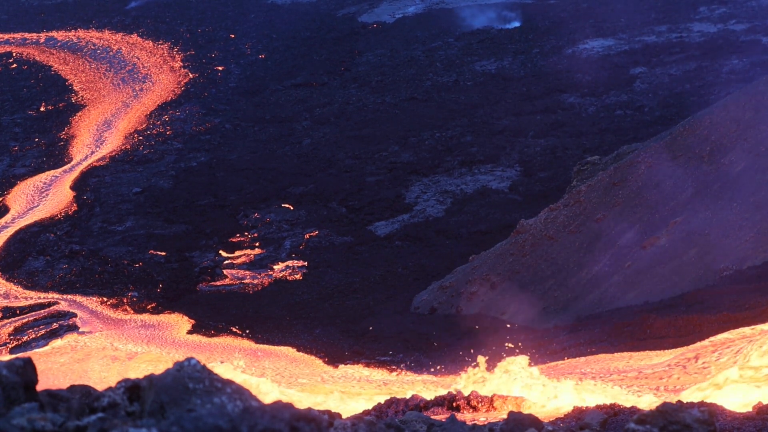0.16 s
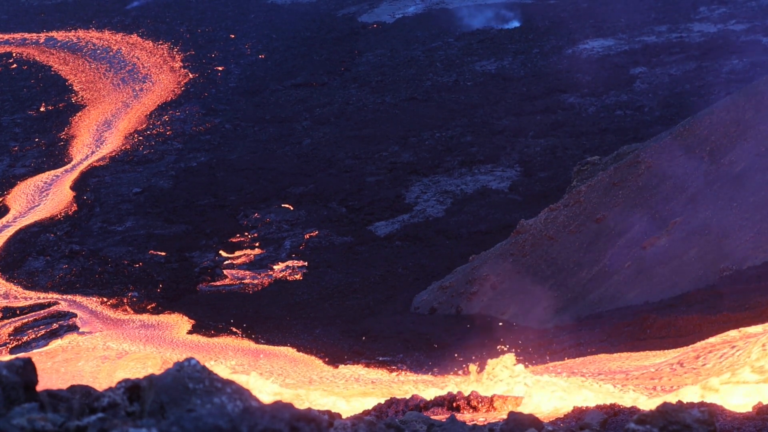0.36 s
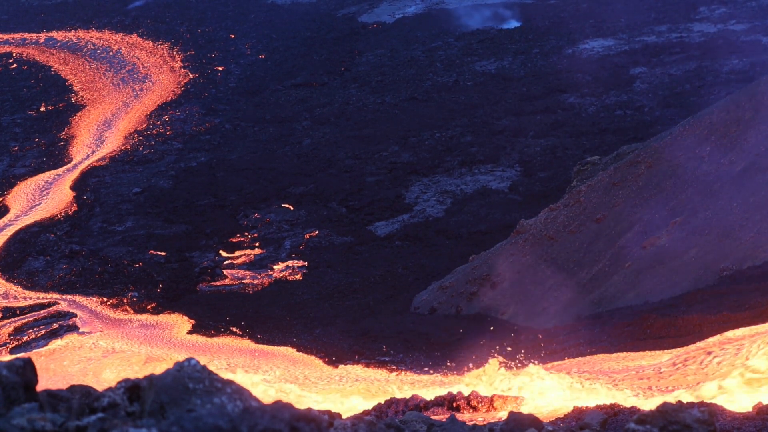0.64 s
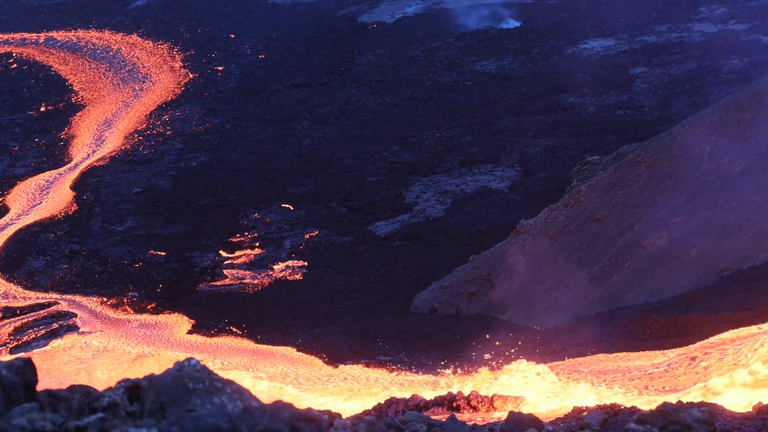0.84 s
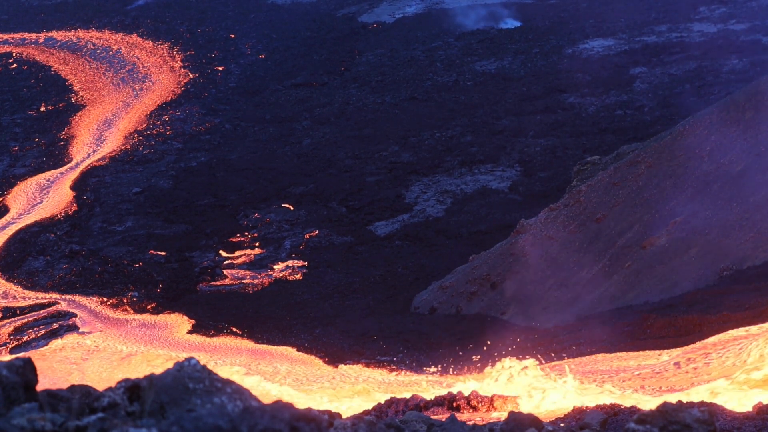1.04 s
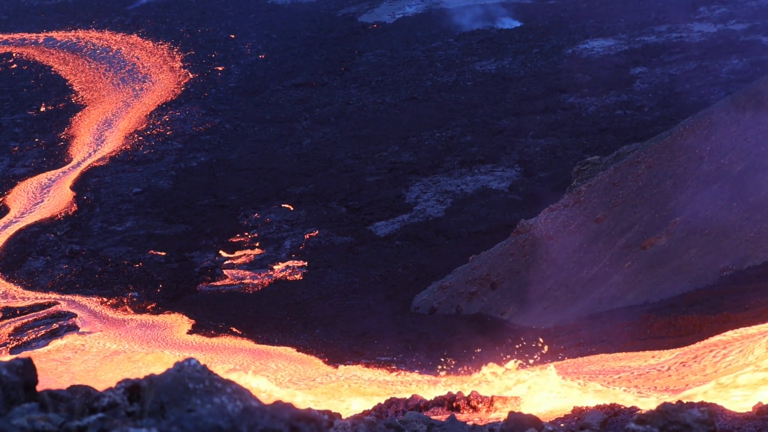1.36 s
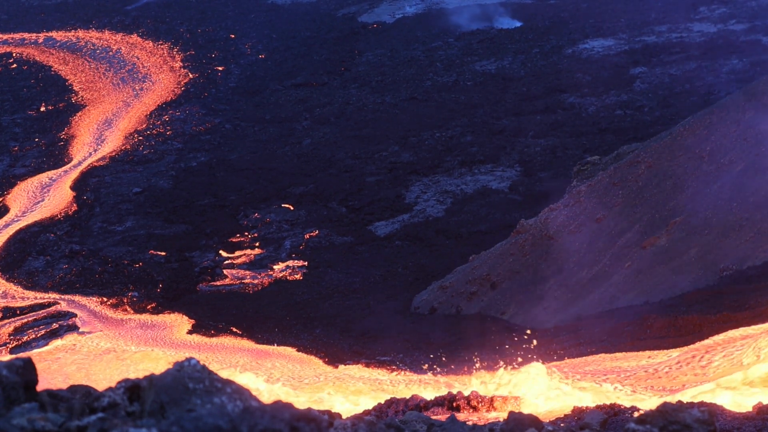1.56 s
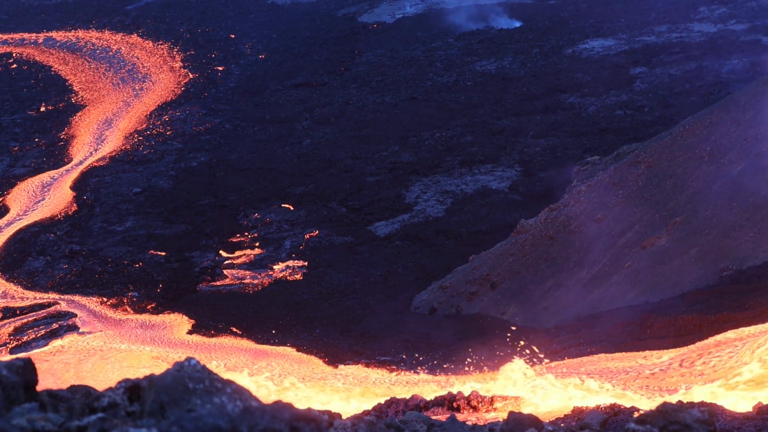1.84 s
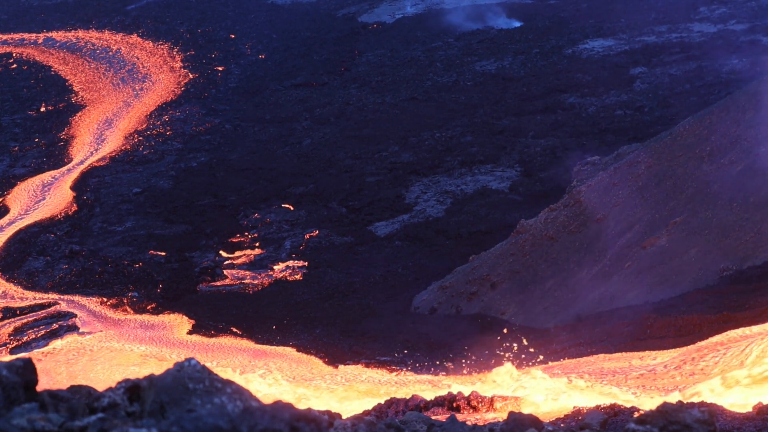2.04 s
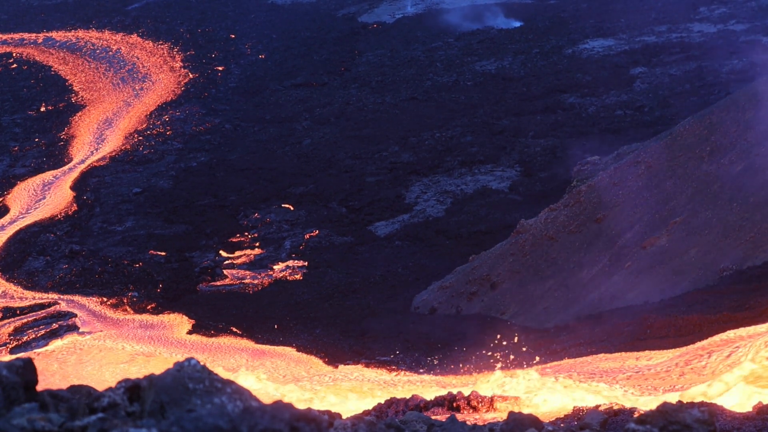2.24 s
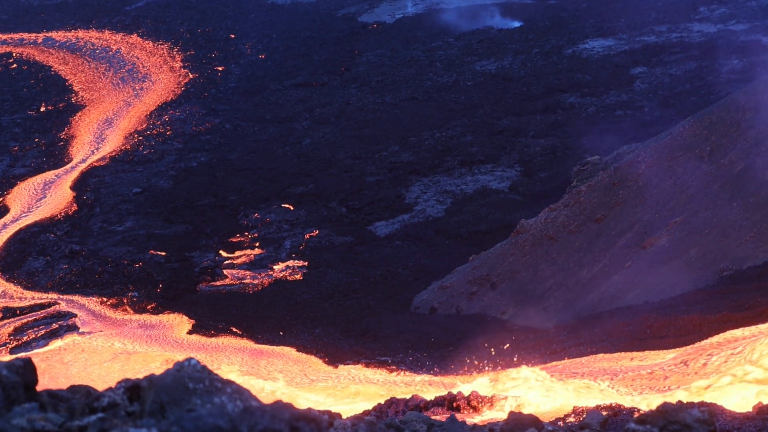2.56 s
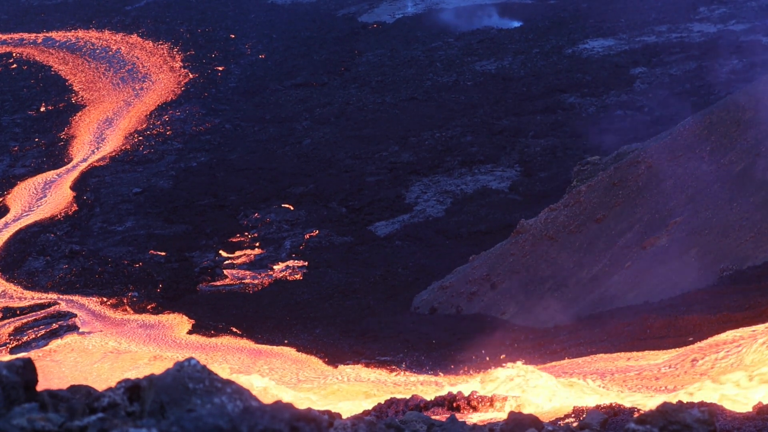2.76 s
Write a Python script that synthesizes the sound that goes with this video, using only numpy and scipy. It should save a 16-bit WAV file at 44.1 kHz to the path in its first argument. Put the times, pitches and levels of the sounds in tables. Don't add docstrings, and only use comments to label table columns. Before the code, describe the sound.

A lava river gives a steady dense rush with small plops and sharp ticks, outdoors at some distance. Gusty wind rumbles and thumps an unshielded stereo camera microphone; loose cinders crunch close on the right near the end.

```python
import sys
import numpy as np
from scipy import signal
from scipy.io import wavfile
from scipy.ndimage import uniform_filter1d

SR = 44100
rng = np.random.default_rng(int(sys.argv[2]) if len(sys.argv) > 2 else 0)


def undo_db(level):
    steps = np.asarray(level, float) / 20
    return 10 ** steps


def wrap_up_sound(samples):
    columns = np.atleast_2d(samples).T
    tamed = np.clip(columns, -1, 1)
    steps = np.round(tamed * 32767).astype(np.int16)
    wavfile.write(sys.argv[1], SR, steps)


N = 128331

# t/s, level/dB
LAVA_SURGE = [(0.0, -43), (1.08, -44), (1.33, -41), (1.56, -42), (1.81, -41), (1.81, -38), (1.84, -44.5),
              (1.97, -40), (2.11, -43), (2.16, -40), (2.42, -43.5), (2.5, -40), (2.5, -36.5), (2.54, -42),
              (2.63, -37), (2.64, -34.5), (2.67, -40), (2.91, -40)]
# f/Hz, density/dB per Hz
LAVA_ROAR = [(400, -10.5), (890, -14), (1300, -13.5), (2600, -18.5), (4060, -23.5), (5500, -20.5),
             (7800, -28.5), (12500, -43)]
# f/Hz, share/1
SURGE_SHARE = [(300, 0.84), (2000, 1), (5000, 0.28), (12000, 0.47)]
# centre t/s, right peak level/dB,
# f/Hz
CLOTS = [(0.085, -31, 822), (0.138, -31, 537), (0.149, -36, 2380), (0.186, -34, 1300), (0.188, -32, 2660),
         (0.286, -28.5, 689), (0.328, -35.0, 1300), (0.337, -35, 830), (0.587, -31, 990),
         (0.665, -20.5, 380), (0.725, -38, 800), (0.737, -45, 540), (0.867, -36, 460), (0.921, -36.0, 1450),
         (1.072, -32.0, 783), (1.184, -31, 1503), (1.241, -40, 1930), (1.243, -30, 830),
         (1.284, -33.0, 1290), (1.304, -34.0, 1230), (1.32, -28, 1200), (1.334, -31, 1080),
         (1.43, -31.5, 1158), (1.464, -32, 1360), (1.585, -33.0, 820), (1.651, -30, 1300),
         (1.708, -31, 845), (1.721, -29, 1002), (1.811, -39, 1800), (1.811, -35.0, 2670),
         (1.843, -25.0, 370), (1.93, -33, 1158), (1.942, -30, 824), (1.952, -30, 1190), (1.985, -33, 783),
         (1.988, -38.0, 2360), (1.994, -32, 1020), (2.082, -40, 1691), (2.188, -38.0, 2470),
         (2.227, -32, 1720), (2.508, -40, 2200), (2.508, -31, 1409), (2.576, -30.0, 1180),
         (2.588, -32.0, 1100), (2.621, -19.0, 550), (2.626, -34, 2740), (2.635, -23, 626),
         (2.645, -18, 1033), (2.667, -23, 653), (2.692, -23, 740), (2.748, -30, 820), (2.817, -26.0, 600),
         (2.86, -24, 1163), (2.886, -24, 820), (2.886, -28.5, 1430), (2.909, -27, 751)]
# t/s, peak level/dB, f/Hz, left minus right/dB
TICKS = [(.081, -28.5, 600, -20), (0.171, -29, 5030, -5), (.189, -35, 1500, -15), (0.283, -24, 1100, -12),
         (.725, -19, 465, -10), (.914, -28.5, 900, -16), (.99, -37, 4000, -18), (1.079, -27, 600, -12),
         (1.494, -29, 1100, 18), (1.712, -32, 2800, -10), (1.809, -23.5, 1840, -14), (1.979, -32, 1170, -3),
         (2.504, -23, 2010, -12)]
# start t/s, length/s, level/dB, pitch scale/1
CRUNCHES = [
    (.645, 0.037, -33.5, 0.54),
    (1.839, .03, -52, 1.04),
    (2.565, 0.014, -36, 2.1),
    (2.607, 0.051, -26.5, 1.06),
    (2.686, 0.051, -37, 1.17),
    (2.792, 0.018, -32, 1.03),
    (2.86, 0.0073, -34, 1.57),
    (2.876, 0.0091, -30.5, 0.71),
]
# f/Hz, width/Hz, level/dB
CINDER_MODES = [(290, 390, -7), (469, 107, 3), (649, 103, -2), (973, 400, -2.5), (1500, 260, -16),
                (2630, 1800, -22), (5560, 3800, -12)]
# f/Hz, left minus right/dB
PORT_PAN = [(60, -10), (130, -8), (290, -4.5), (640, -11.5), (1410, -8.0), (3100, -7), (6820, -1.5),
            (15000, 2)]
# f/Hz, correlation/1
PORT_SAME = [(300, .3), (700, .58), (1500, .66), (2800, .68), (5000, .8), (8000, .55), (10000, .4),
             (12500, .05)]
# f/Hz, left lead/rad
PORT_TURN = [(340, -.8), (690, 0.0), (1980, .4), (3190, .25), (4570, 1.0), (6500, .6), (8350, .5),
             (10500, 0.0)]
# centre t/s, peak level/dB, f/Hz, left minus right/dB
EDDIES = [(0.146, -24, 53.7, -13), (0.157, -40, 111, 0), (0.195, -31.5, 178, 11), (0.475, -20, 33.2, -2.5),
          (0.661, -24, 54, -3), (0.684, -21, 88.4, -5), (0.733, -29, 169, 0.0), (0.739, -23, 66, -5),
          (0.873, -27.5, 96, 8), (0.874, -24.5, 49.7, 3), (0.928, -26, 81, -7), (0.955, -23.5, 32, -10),
          (1.035, -20, 80, -4.0), (1.033, -26, 132, -8), (1.108, -21.5, 78, -6.5), (1.173, -23, 36.7, -3),
          (1.238, -24.5, 40.7, -0.0), (1.384, -34, 66, 3.0), (1.386, -31, 132, 6), (1.397, -21.5, 95, 0),
          (1.427, -29, 37.4, -16), (1.503, -22.5, 99, -10.0), (1.583, -24.5, 31.7, 4),
          (1.611, -23, 57.3, 1), (1.69, -19, 66.4, -2), (1.721, -25, 119, 0), (1.772, -23.5, 49, -13),
          (1.772, -29, 94, -3), (1.791, -33, 136, -5.0), (1.801, -29, 177.6, 0), (1.836, -31, 207, 0),
          (1.846, -14.5, 56.7, 1.5), (1.901, -27, 138, 3.0), (1.91, -30, 200, -2), (1.934, -32, 107, 17),
          (1.992, -28, 59, -5.0), (1.991, -31, 145, -5), (2.031, -24, 32.7, 9), (2.084, -25.6, 111, -5.5),
          (2.125, -24.5, 32.7, -7), (2.161, -23, 122, -8), (2.189, -25, 68.6, -7), (2.506, -36, 133, 4),
          (2.548, -25.5, 140, -6), (2.549, -22.4, 84.5, -3), (2.635, -33.5, 258, -15), (2.685, -29, 57, -8),
          (2.76, -22, 75, 3)]
# t/s, gust level/dB, sharpness/dB
GUSTS = [(0.0, -22, -22.5), (0.14, -19.5, -15), (0.29, -27.5, -3.5), (0.49, -21.5, -21), (0.53, -25, -10.5),
         (0.7, -20, -21), (0.76, -29, 3), (1.18, -20, -8.5), (1.34, -27, -5.5), (1.39, -22, -12.5),
         (2.14, -22, -9.5), (2.24, -25.5, -7.5), (2.59, -22, -11.5), (2.64, -26, 4), (2.68, -20.5, -12),
         (2.72, -28, 12), (2.75, -22.5, -14), (2.91, -24.5, -17)]
# f/Hz, density/dB per Hz
BUFFET = [(8.8, -37), (15, -5), (38, 2), (75, -2), (109, -2.5), (221, -13), (409, -15.5), (900, -13),
          (1170, -65), (1980, -120)]
# f/Hz, correlation/1
BUFFET_SAME = [(30, 1), (80, 0.84), (160, 0.055), (300, -0.23), (600, 0.72)]


def evened(x):
    return x / np.sqrt(np.mean(x ** 2) + 1e-20)


def read(points, hz):
    f, value = np.transpose(points)
    return np.interp(np.log(hz + 1), np.log(f + 1), value)


def add(mix, start_s, sound):
    part = mix[..., round(start_s * SR):][..., :sound.shape[-1]]
    part += sound[..., :part.shape[-1]]


def panned(left_minus_right_db):
    return left_minus_right_db * np.array([[.5], [-.5]])


def highpass(hz, corner_hz, order):
    return 1 / (1 + (corner_hz / (hz[:, None] + 1)) ** order)


def ring(x, hz, width_hz):
    r = np.exp(-np.pi * width_hz / SR)
    pole = [1, -r * np.exp(2j * np.pi * hz / SR)]
    return 2 * signal.lfilter([(1 - r) ** 2], np.convolve(pole, pole), x).real


def blobs(shape, bins, frames):
    field = uniform_filter1d(rng.standard_normal(shape), bins, 0)
    return evened(uniform_filter1d(field, frames, 1))


def spectra(x, size):
    return signal.stft(x, SR, nperseg=size, noverlap=size * 3 // 4)


def sound_of(z, size):
    return signal.istft(z, SR, nperseg=size, noverlap=size * 3 // 4)[1][..., :N]


def pair(a, b, same):
    same = np.clip(same, -1, 1)[:, None]
    return np.array([same * a + np.sqrt(1 - same ** 2) * b, a])


def spatter():
    rate_per_s, spread_db, decay_samples = 700, 0.5, 9.3
    landed = rng.random((2, N)) < rate_per_s / SR
    strength = undo_db(spread_db * np.minimum(rng.exponential(1, (2, N)), 5))
    click = rng.standard_normal(200) * np.exp(-np.arange(200) / decay_samples)
    drops = landed * strength * rng.choice([-1., 1.], (2, N))
    return evened(signal.oaconvolve(drops, click[None])[:, :N])


def lava():
    level_db, spatter_db, patch_db, flicker_db = -39.5, -21, 0.5, 0.82
    fizz_hz, fizz_db = 10800, 1.5
    clicks = undo_db(spatter_db) * spatter()
    hz, t, z = spectra(rng.standard_normal((2, N)) + clicks, size=512)
    shape = z[0].shape
    surge = np.interp(t, *np.transpose(LAVA_SURGE))
    field = read(LAVA_ROAR, hz)[:, None] + read(SURGE_SHARE, hz)[:, None] * (surge - surge.mean())
    field = field + patch_db * blobs(shape, bins=8, frames=25)
    field = field + flicker_db * blobs(shape, bins=60, frames=8)
    field = field + fizz_db * blobs(shape, bins=25, frames=14) * highpass(hz, fizz_hz, 8)
    return undo_db(level_db) * evened(sound_of(z * undo_db(field) * highpass(hz, 224.0, 4), size=512))


def puff(hz, length_s, sag):
    u = np.arange(0, length_s, 1 / SR) / length_s
    phase = rng.random() + 0.16 * rng.standard_normal((2, 1))
    turns = np.cumsum(hz * (1 + sag * (.5 - u))) / SR + phase
    return np.sin(np.pi * u ** 0.95) ** 2 * np.sin(2 * np.pi * turns)


def clots():
    length_s, level_db, sag, left_db = 0.00894, 0.5, 0.19, -15
    mix = np.zeros((2, N))
    for centre_s, peak_db, hz in CLOTS:
        gain = undo_db(peak_db + level_db + left_db * np.array([[1], [0]]))
        add(mix, centre_s - length_s / 2, puff(hz, length_s, sag) * gain)
    return mix


def tick(peak_db, hz, pan_db):
    t60_s, spread, level_db, attack_s = 0.042, 0.48, -8.5, 0.00093
    t = np.arange(0, .05, 1 / SR)
    spit = rng.standard_normal(len(t)) * np.minimum(t / attack_s, 1) * undo_db(-60 * t / t60_s)
    x = ring(spit, hz * 0.92, hz * 2 * spread)
    return x / abs(x).max() * undo_db(peak_db + level_db + panned(pan_db))


def ticks():
    mix = np.zeros((2, N))
    for start_s, *row in TICKS:
        add(mix, start_s, tick(*row))
    return mix


def crunch(length_s, level_db, scale):
    slips_per_s, rise_s, tail_s = 260, .014, 0.017
    t = np.arange(0, length_s + .1, 1 / SR)
    wander = evened(uniform_filter1d(rng.standard_normal(9000), size=150))
    turns = np.cumsum(slips_per_s * (1 + .7 * wander)) / SR
    slips = np.diff(np.floor(turns), prepend=0) + 0.017 * rng.standard_normal(9000)
    x = np.zeros(9000)
    for k, (hz, width_hz, db) in enumerate(CINDER_MODES):
        x += (-1) ** k * undo_db(db) * evened(ring(slips, hz * scale, width_hz * scale))
    shape = np.minimum(t / rise_s, 1) * np.exp(-np.maximum(t - length_s, 0) / tail_s)
    return undo_db(level_db) * evened(x)[1000:1000 + len(t)] * shape


def crunches():
    mix = np.zeros((2, N))
    for start_s, *row in CRUNCHES:
        add(mix, start_s, np.array([crunch(*row), crunch(*row)]))
    return mix


def ports(direct, scattered):
    hz, t, (za, zb) = spectra(np.array([direct, scattered]), size=512)
    z = pair(za, zb, read(PORT_SAME, hz))
    half = undo_db(read(PORT_PAN, hz) / 2)
    z = z * np.array([half * np.exp(1j * read(PORT_TURN, hz)), 1 / half])[..., None]
    return sound_of(z, size=512)


def eddies():
    level_db, sag = 2.5, 0.1
    mix = np.zeros((2, N))
    for centre_s, peak_db, hz, pan_db in EDDIES:
        length_s = 0.0527 * (75 / hz) ** 0.355
        gain = undo_db(peak_db + level_db + panned(pan_db))
        add(mix, max(centre_s - length_s / 2, 0), puff(hz, length_s, sag) * gain)
    return mix


def wind():
    reach_from_hz, reach, lump_db, pan_db = 118, 0.38, 1, -3
    hz, t, (a, b) = spectra(rng.standard_normal((2, N)), size=2048)
    s, gust_db, sharp_db = np.transpose(GUSTS)
    sharpness = np.interp(t, s, sharp_db - sharp_db.mean())
    field = read(BUFFET, hz)[:, None] + reach * highpass(hz, reach_from_hz, 4) * sharpness
    z = pair(a, b, read(BUFFET_SAME, hz)) * undo_db(field)
    z = z / (1 + (hz[:, None] / 368.0) ** 4) * highpass(hz, 16.4, 4)
    z = z * undo_db(lump_db * np.array([blobs(a.shape, bins=6, frames=4) for _ in "lr"]))
    level = np.interp(np.arange(N) / SR, s, gust_db)
    return evened(sound_of(z, size=2048)) * undo_db(level + panned(pan_db))


def hiss():
    corner_hz, level_db, same = 11800, -60, -0.14
    hz, t, (a, b) = spectra(rng.standard_normal((2, N)), size=512)
    z = pair(a, b, same + 0 * hz) * highpass(hz, corner_hz, 6)
    return undo_db(level_db) * evened(sound_of(z, size=512))


def scene():
    crunch_db, crunch_pan_db, wind_db = -4, -3.5, -2.5
    cinders = ports(*crunches()) * undo_db(crunch_db + panned(crunch_pan_db))
    clinker = ticks()
    flow = ports(*lava())
    gusts = undo_db(wind_db) * wind()
    return flow + cinders + gusts + clinker + clots() + eddies()


def top_cut(x):
    return signal.sosfilt(signal.butter(12, 15790, fs=SR, output="sos"), x)


def record(dry):
    top_hz, thin_db_per_db, patch_db = 10300, .45, 5
    hz, t, (left, right) = spectra(dry + hiss(), size=1024)
    mid, side = (left + right) / 2, (left - right) / 2
    loud = 10 * np.log10(uniform_filter1d((abs(mid) ** 2).sum(0), size=5) + 1e-12)
    thin = -thin_db_per_db * (loud - np.median(loud)) + patch_db * blobs(mid.shape, bins=120, frames=4)
    mid = mid * undo_db(np.minimum(thin - 1, 1.5) * highpass(hz, top_hz, 16))
    mix = sound_of(np.array([mid + side, mid - side]), size=1024)
    return top_cut(mix)


dry = scene()
out = record(dry)
wrap_up_sound(out)
```